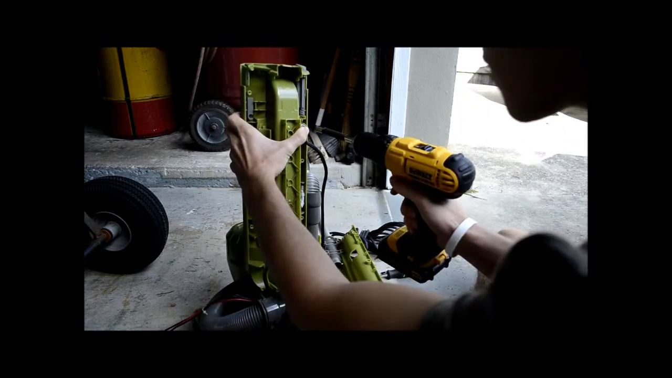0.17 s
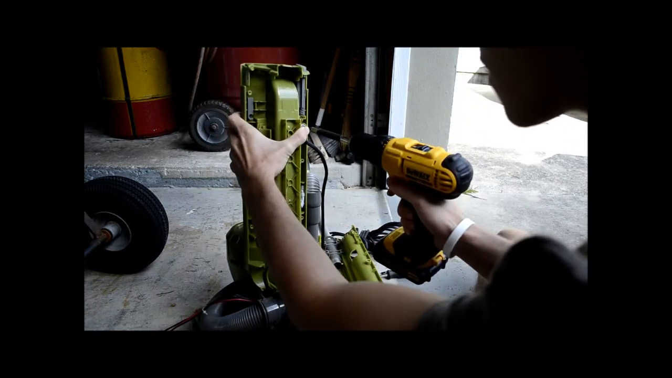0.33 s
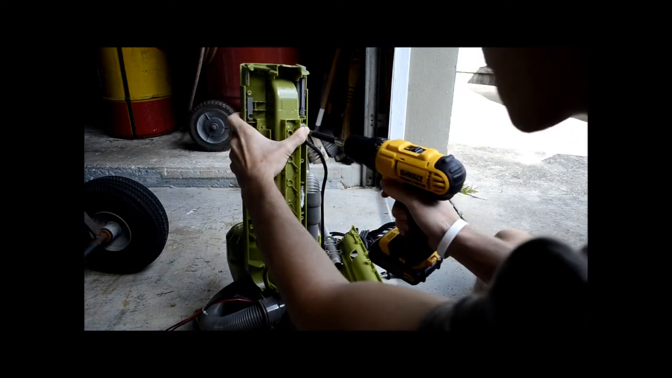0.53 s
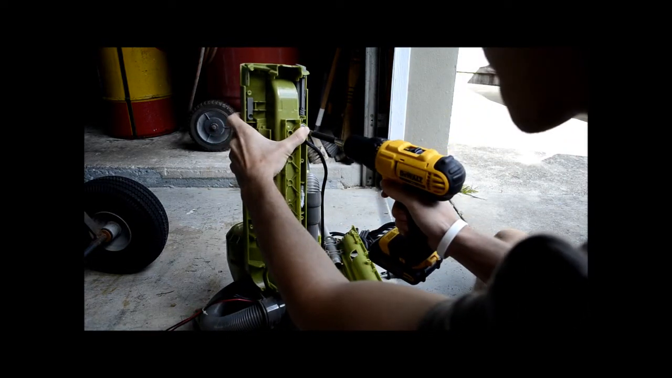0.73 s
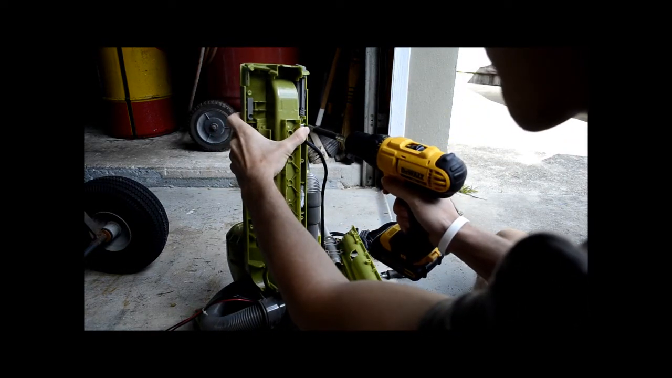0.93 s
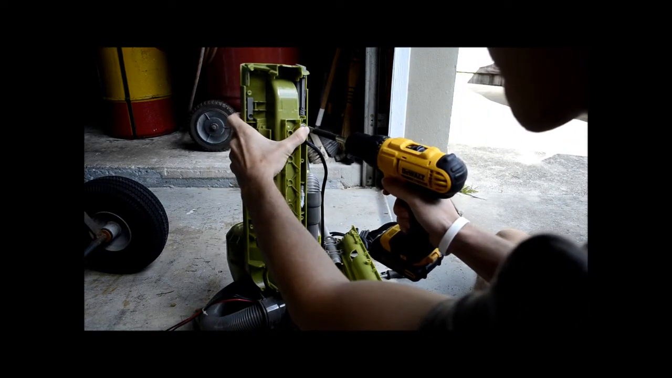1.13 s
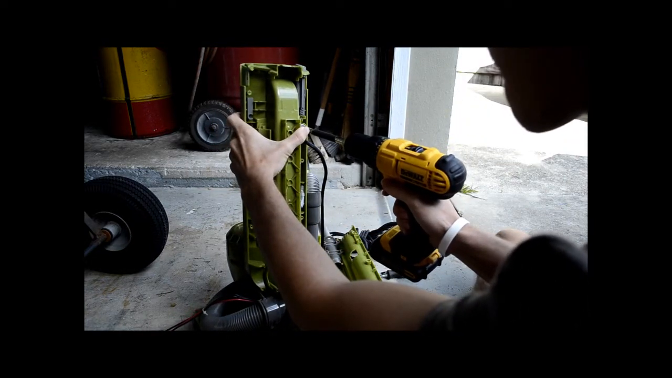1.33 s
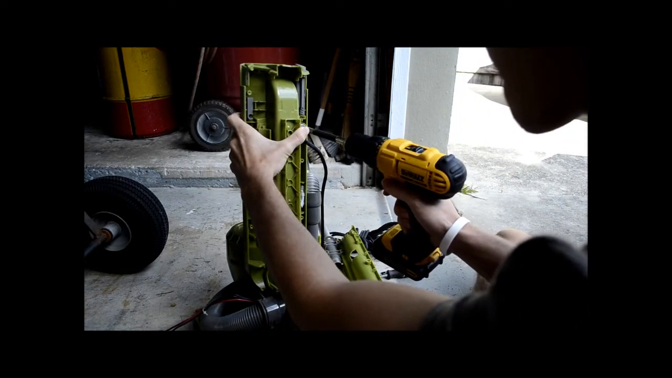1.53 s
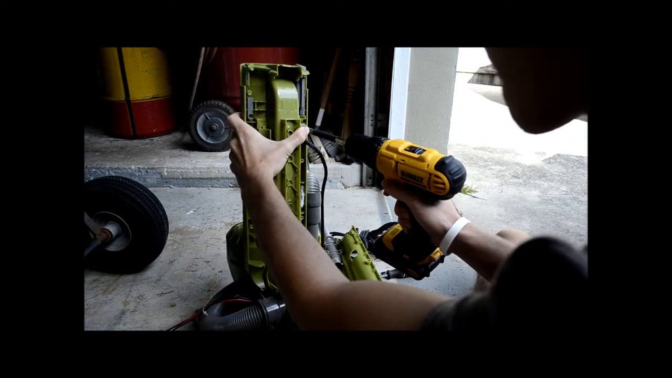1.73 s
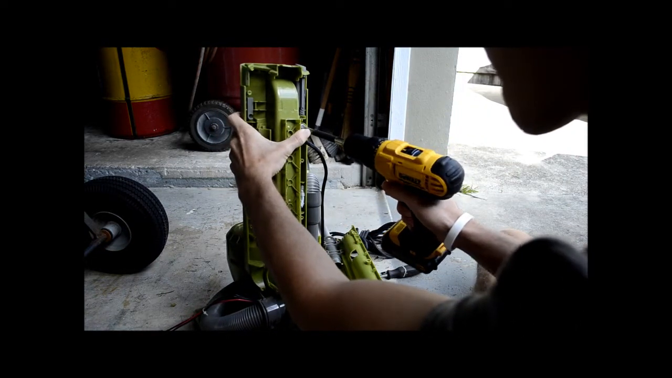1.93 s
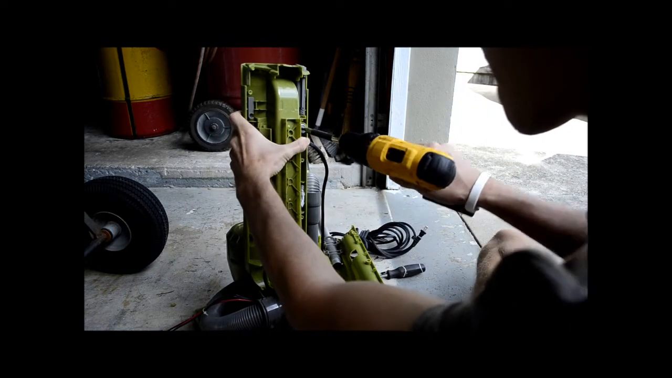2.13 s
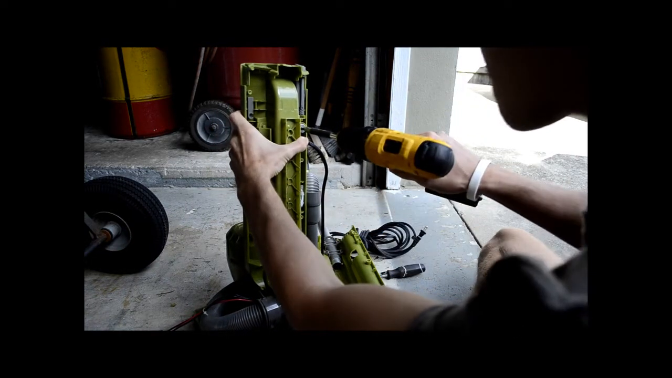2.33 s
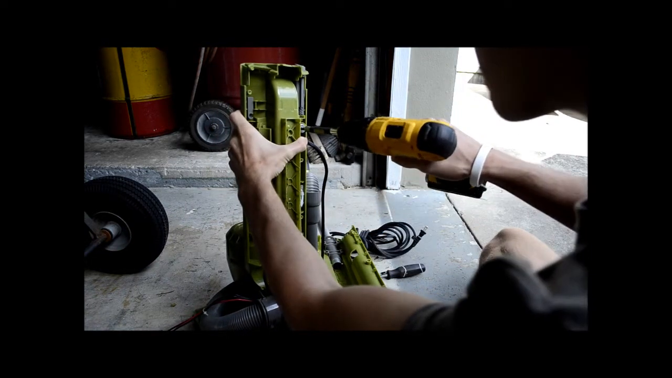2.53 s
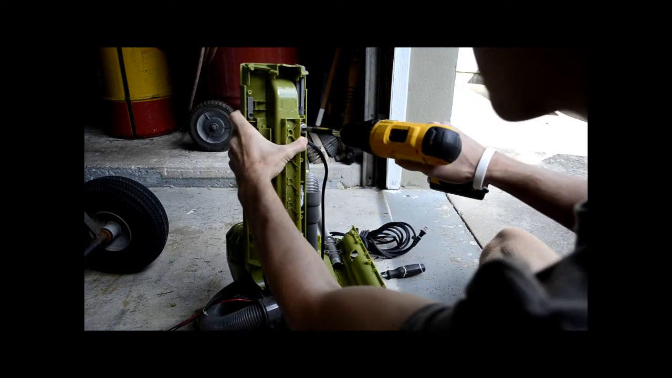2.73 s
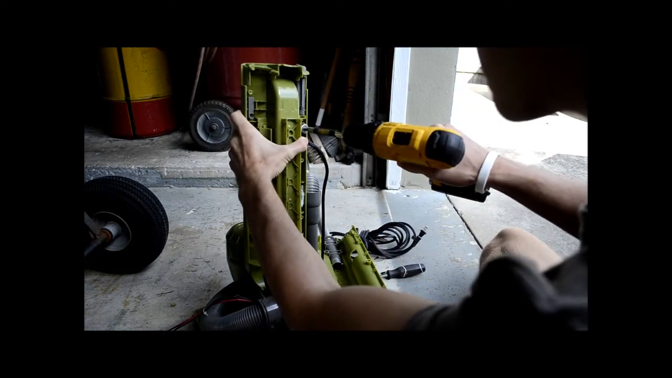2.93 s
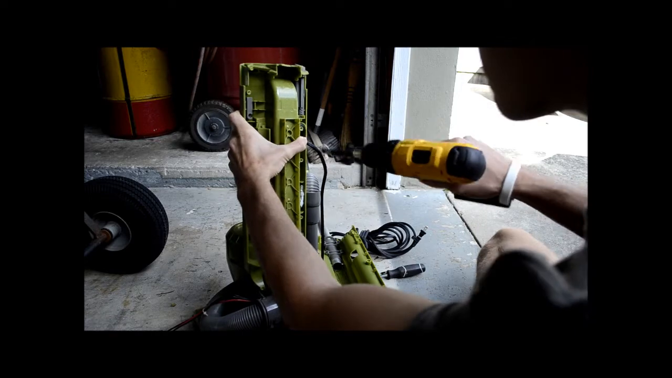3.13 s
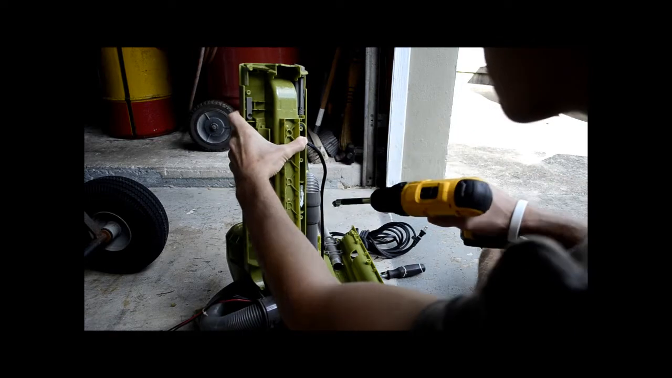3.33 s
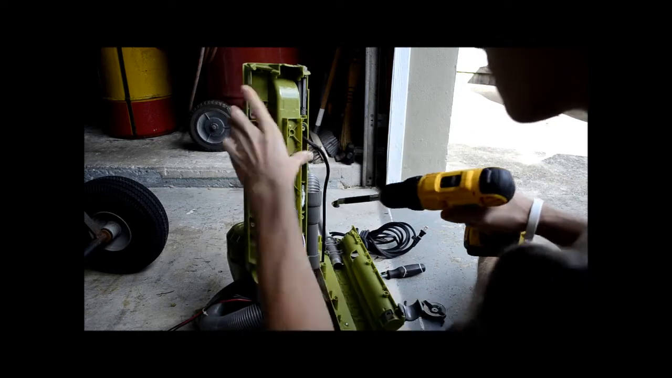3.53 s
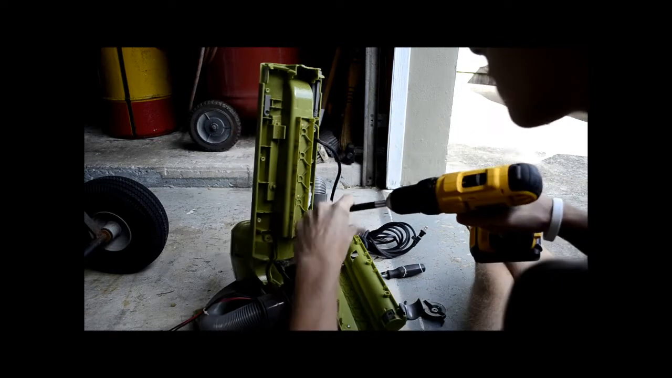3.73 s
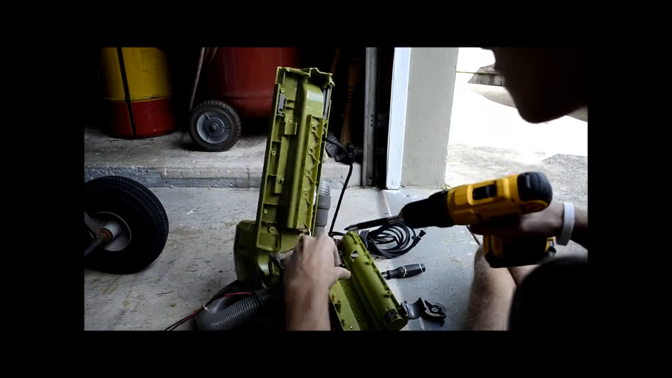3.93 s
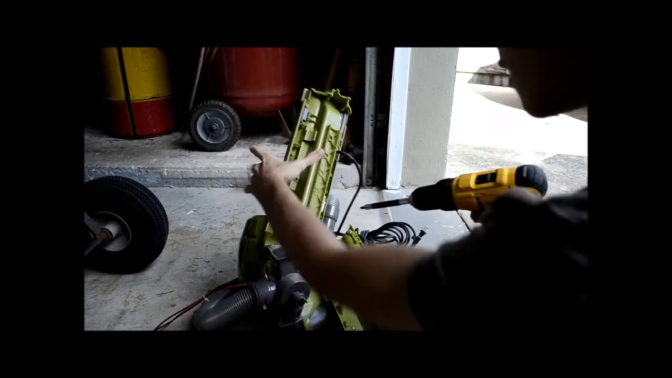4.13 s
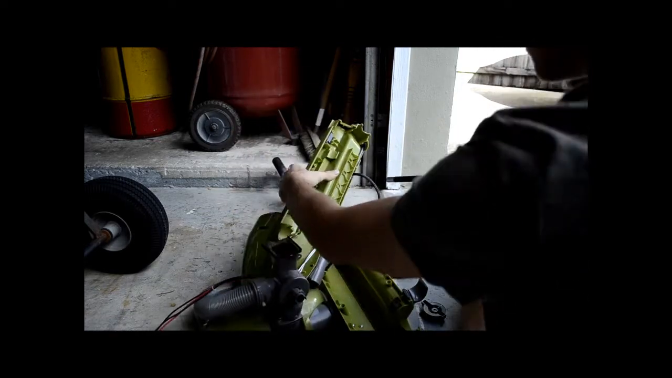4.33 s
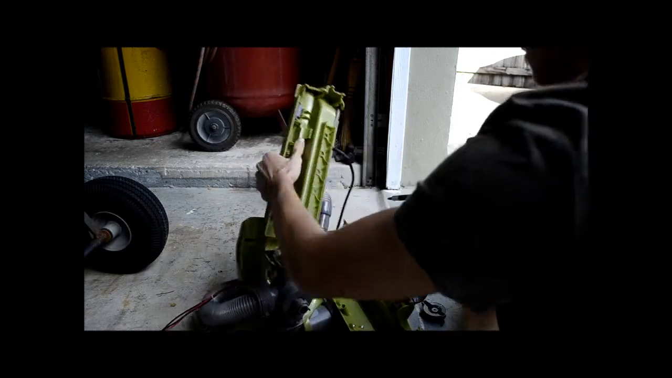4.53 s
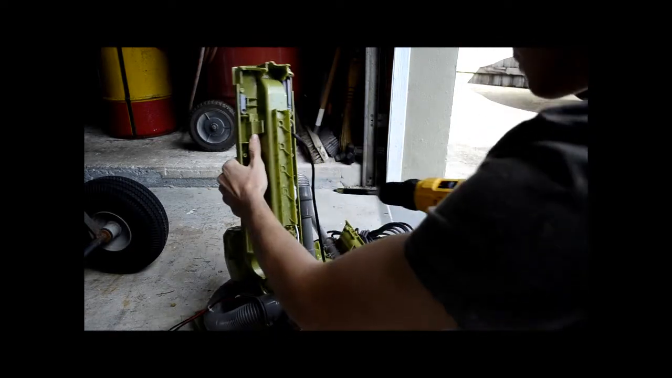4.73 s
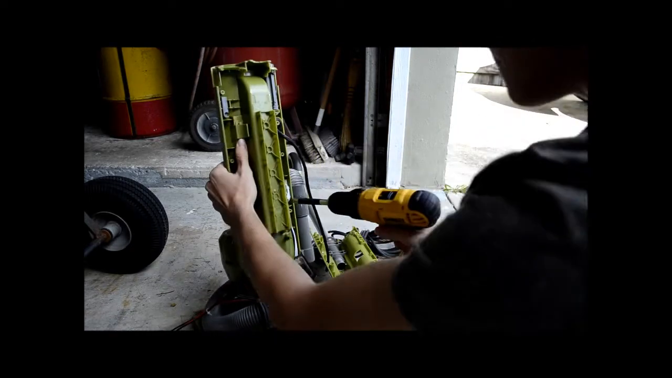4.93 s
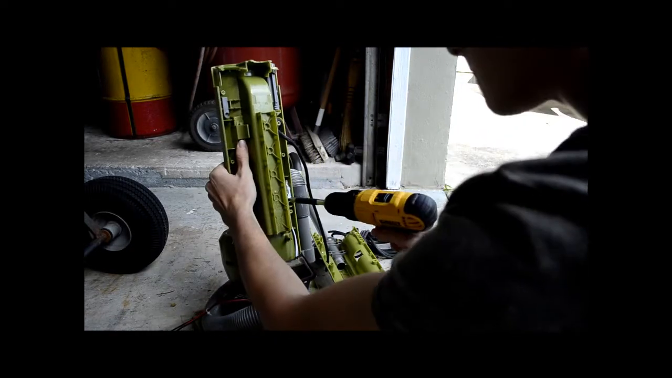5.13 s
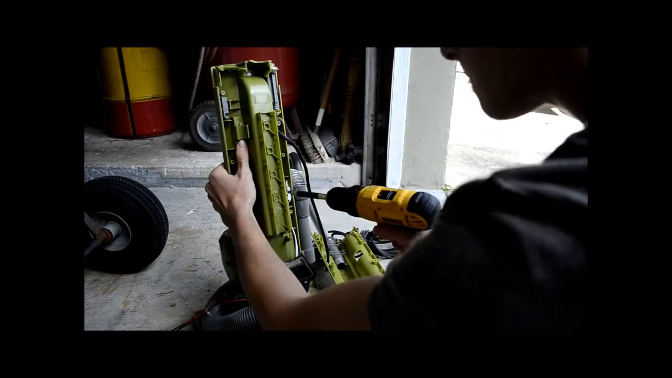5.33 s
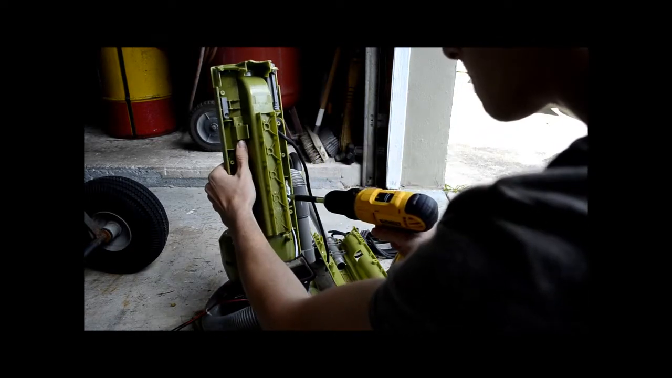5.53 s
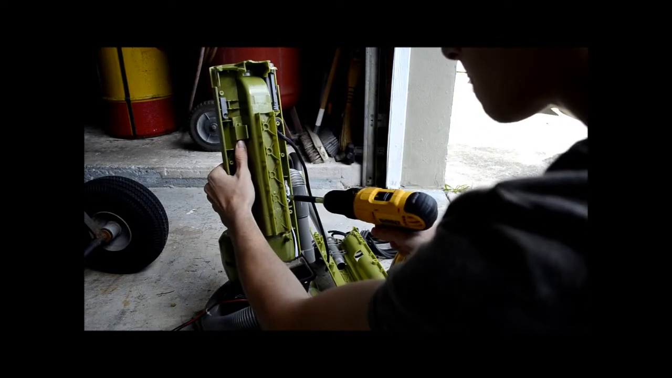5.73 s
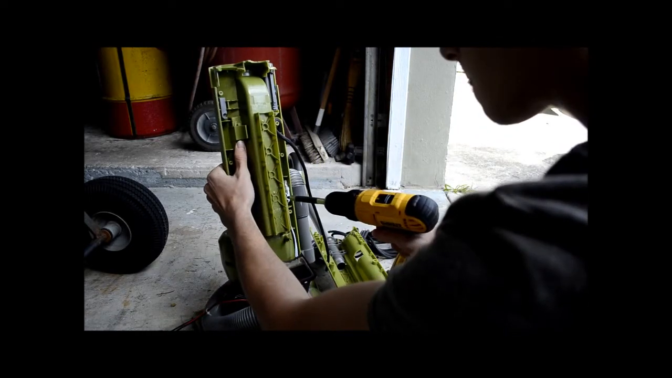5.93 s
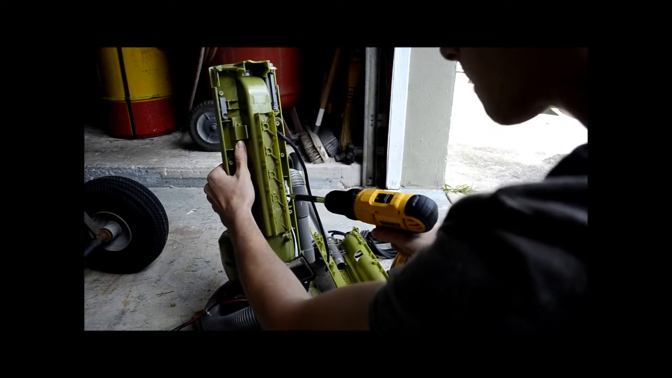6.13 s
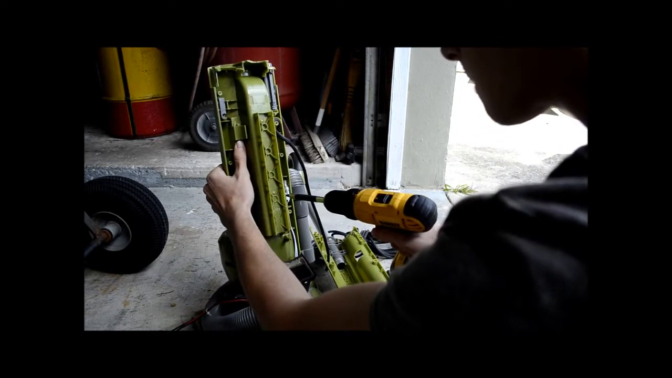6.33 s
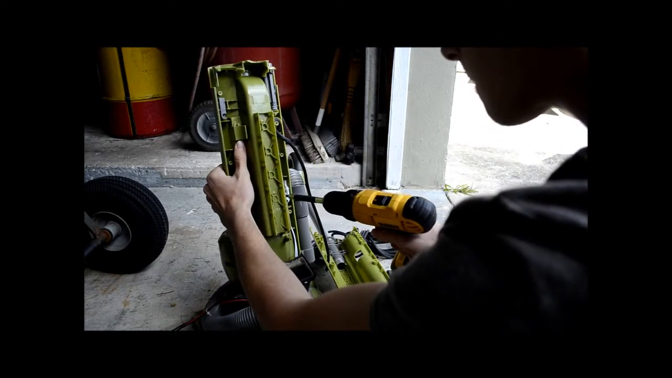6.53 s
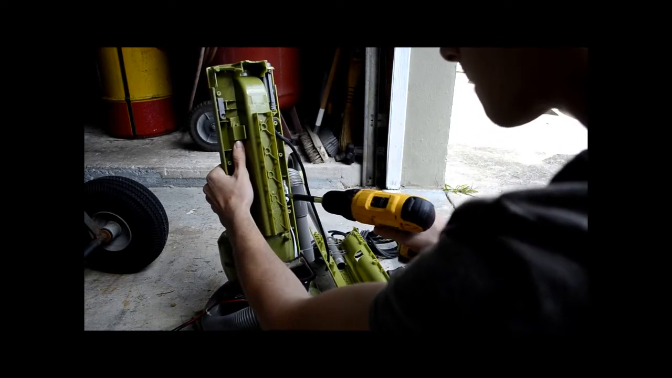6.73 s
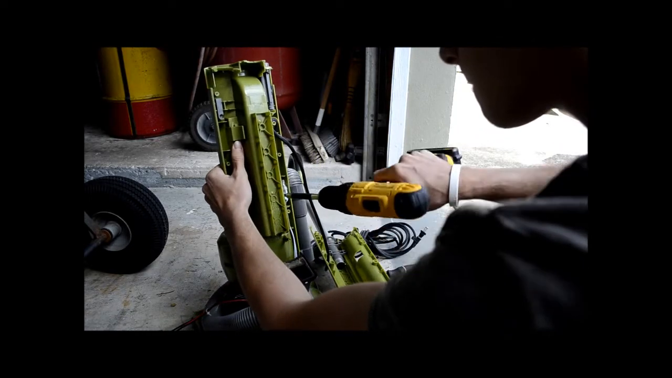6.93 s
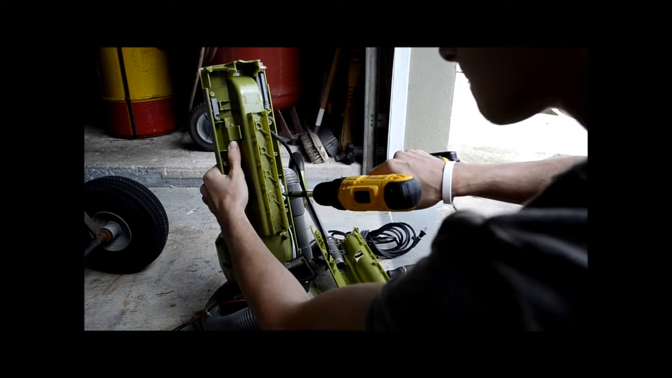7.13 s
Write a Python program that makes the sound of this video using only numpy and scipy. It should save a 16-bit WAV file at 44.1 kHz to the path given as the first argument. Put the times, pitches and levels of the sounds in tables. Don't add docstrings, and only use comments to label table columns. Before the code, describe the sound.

Low outdoor rumble and faint machine hum lie behind sparse handling knocks. The drill whirrs up quickly, runs briefly with rattling gears and hissing fan, and stops abruptly amid clicks. Small ticks lead to a cluster of hollow plastic thumps, scraping strokes on concrete and ringing loose parts. Quieter dull taps follow before the drill spins up once more. Near perspective, identical channels, short garage tail.

```python
import sys
import numpy as np
from scipy import signal
from scipy.fft import rfft, irfft
from scipy.io import wavfile

SR = 44100
rng = np.random.default_rng(int(sys.argv[2]) if len(sys.argv) > 2 else 0)


def wav_out(sig):
    wavfile.write(sys.argv[1], SR, np.round(np.clip(np.atleast_2d(sig).T, -1, 1) * 32767).astype(np.int16))


def gain_from_decibels(decibels):
    exponent = np.asarray(decibels, float) / 20
    return 10 ** exponent


N = 316197
T = np.arange(N) / SR


def rms_one(x):
    return x / np.sqrt(np.mean(x ** 2) + 1e-20)


def at_hz(points, hz):
    point_hz, level_db = np.array(points)[:, 0], np.array(points)[:, 1]
    return np.interp(np.log(np.maximum(hz, 1)), np.log(point_hz), level_db)


def colour(x, spectrum):
    hz = np.arange(N // 2 + 1) * SR / N
    return rms_one(irfft(rfft(x) * gain_from_decibels(at_hz(spectrum, hz)), N))


def drift(rate_hz):
    r = np.exp(-80 * np.pi * rate_hz / SR)
    noise = rng.standard_normal(N // 40 + 2002)
    slow = signal.lfilter([1], [1, -2 * r, r * r], noise)[2000:]
    return np.interp(np.arange(N) / 40, np.arange(len(slow)), rms_one(slow))


def resonate(x, hz, width_hz):
    r = np.exp(-np.pi * width_hz / SR)
    poles = [1, -2 * r * np.cos(2 * np.pi * hz / SR), r * r]
    return signal.lfilter([(1 - r * r) / 2, 0, (r * r - 1) / 2], poles, x + 1e-18)


def body(x, modes):
    total = 0
    for k, (hz, width_hz, level_db) in enumerate(modes):
        total = total + (-1) ** k * gain_from_decibels(level_db) * resonate(x, hz, width_hz)
    return rms_one(total)


def grains(per_s, spread_db):
    sizes = gain_from_decibels(spread_db * np.minimum(rng.exponential(1, N), 4)) * rng.choice([-1, 1], N)
    return sizes * (rng.random(N) < per_s / SR)


FULL_SPEED, SPIN_UP_S = 324.9, .06
COAST_TURNS_PER_S2, BRAKE_TURNS_PER_S2 = 525, 3300

# pull_s, let_go_s, brake_s, gear_load_db, slot_load_db
TRIGGER_PULLS = [
    (2.438, 2.885, 2.98, 2.1, -1.5),
    (7.003, 8.0, 8.1, 2.8, 1.5),
]


def shaft():
    speed, load_db = np.zeros(N), np.zeros((2, N))
    for pull, let_go, brake, *db in TRIGGER_PULLS:
        rise = FULL_SPEED * (1 - np.exp(-np.maximum(T - pull, 0) / SPIN_UP_S))
        coast_loss = COAST_TURNS_PER_S2 * np.maximum(T - let_go, 0)
        brake_loss = BRAKE_TURNS_PER_S2 * np.maximum(T - brake, 0)
        speed = speed + np.maximum(rise - coast_loss - brake_loss, 0)
        load_db = np.where(T > pull, np.c_[db], load_db)
    return speed, load_db


# pitch_hz, width_hz, level_db
GEARBOX_MODES = [(540, 60, -12), (975, 70, -9), (1400, 35, 0), (1620, 90, -9), (2280, 250, -16),
                 (3300, 600, -14)]
# pitch_hz, level_db per Hz
GEAR_SPECTRUM = [(150, -56), (250, -22), (313, -16.5), (413, -47), (968, -6), (1200, -12.5), (1370, -6),
                 (1740, -10), (5000, -35), (6500, -57), (11000, -120)]


def gears(turns, share, load_db):
    beat = 1 + 0.21 * np.cos(np.pi * turns + 0.82 * drift(27)) ** 3
    teeth = grains(9000, spread_db=2.5) * beat ** 2
    rattle = rms_one(body(teeth, GEARBOX_MODES) + 1.6 * colour(teeth, GEAR_SPECTRUM))
    return gain_from_decibels(-31.5 + load_db) * share ** 3.1 * rattle


# pitch_hz, level_db per Hz
FAN_SPECTRUM = [(2350, -8.5), (4000, -25), (5120, -10), (5940, -12), (7460, -7), (8610, -7), (9330, -10),
                (10100, -6), (10600, -8), (11600, -10), (15700, -24)]
# pitch_hz, width_hz, level_db
FAN_MODES = [(5110, 130, -1), (8440, 60, -6), (9640, 47, -3), (11500, 70, -8)]


def fan(turns, share):
    air = rng.standard_normal(N) * (1 + 0.17 * np.cos(2 * np.pi * turns)) * gain_from_decibels(1.1 * drift(45))
    hiss = rms_one(colour(air, FAN_SPECTRUM) + .35 * share ** 4 * body(air, FAN_MODES))
    return gain_from_decibels(-40) * share ** 1.2 * hiss


# multiple of shaft speed, level_db
SHAFT_ORDERS = [(4, -45), (5, -43), (7, -53), (10, -57), (11, -58), (15, -58), (20, -63), (21, -63),
                (26, -59), (31, -50), (32, -61), (33, -63), (35, -61), (38, -67), (41, -65), (42, -72),
                (47, -72)]


def whine(turns, speed):
    free = np.exp(-((speed - FULL_SPEED) / 6) ** 2)
    tones = 0
    for k, level_db in SHAFT_ORDERS:
        level = gain_from_decibels(level_db + 5 + 2.5 * drift(15))
        tones = tones + level * np.sin(2 * np.pi * (k * turns + rng.random()))
    return free * tones


# multiple of shaft speed, level_db
MAGNETIC_ORDERS = [(8, -4), (10, -7), (12, 0), (14, -10), (16, -9), (24, -8)]
# pitch_hz, width_hz, level_db
MOTOR_CASE = [(2500, 560, -1), (3310, 570, -0.3), (5030, 1140, -1.5)]


def slots(turns, speed, load_db):
    share = speed / FULL_SPEED
    strain = np.abs(np.gradient(speed)) * SR * SPIN_UP_S / FULL_SPEED
    sparks = rms_one(signal.lfilter([1], [1, -.965], rng.standard_normal((len(MAGNETIC_ORDERS), N))))
    lines = 0
    for (k, level_db), spark in zip(MAGNETIC_ORDERS, sparks):
        level = gain_from_decibels(level_db) * (.65 * gain_from_decibels(4 * drift(25)) + spark)
        lines = lines + level * np.sin(2 * np.pi * k * turns + drift(25))
    whirr = .5 * lines + body(lines, MOTOR_CASE)
    return gain_from_decibels(-51 + load_db) * share ** 1.4 * (1 + 6.3 * strain) * whirr


CHOPPER_HZ = 3940
# start_s, end_s, level_db
CHOPPER_BURSTS = [
    (2.449, 2.482, -48),
    (7.002, 7.03, -52),
]


def chopper(turns):
    gate = 0
    for on, off, level_db in CHOPPER_BURSTS:
        gate = gate + gain_from_decibels(level_db) * np.interp(T, [on, on + .004, off - .012, off], [0, 1, .35, 0])
    wobble = 1.5 * np.sin(2 * np.pi * turns)
    harmonics_db = [0, -14, -18]
    whistle = sum(gain_from_decibels(db) * np.sin(2 * np.pi * k * CHOPPER_HZ * T + wobble)
                  for k, db in enumerate(harmonics_db, 1))
    return gate * whistle


def drill():
    speed, (gear_db, slot_db) = shaft()
    turns, share = np.cumsum(speed) / SR, speed / FULL_SPEED
    motor = gears(turns, share, gear_db) + fan(turns, share) + slots(turns, speed, slot_db)
    return motor + whine(turns, speed) + chopper(turns)


# start_s, peak_db, boom_db, clack_db
SOLID_BLOWS = [(0.4875, -16.5, -2.5, -25.5), (2.1075, -32.5, 3, -45), (2.1125, -14, -19, -42),
               (2.119, -13.5, 1, -12), (2.4655, -12, -9, -16.5), (3.684, -36, 8.5, -22),
               (4.079, -21.5, -6, -24), (4.0964, -11, -15, -5), (4.1688, -11.5, -5, -32),
               (4.2192, -5, -4, -22), (4.5577, -15, -16, -4), (4.582, -14.5, -23, -8),
               (4.6436, -18.5, -1.5, -5.5), (4.6858, -25, 6, -12), (4.7595, -26, -16, -0.5),
               (5.4023, -17, 0, -25.5), (6.2103, -18.5, 0, -20), (6.772, -17.5, 0, -19)]
# start_s, peak_db, boom_db, clack_db
PLASTIC_TAPS = [(1.2989, -24.5, -4, -25), (1.3987, -27, -13, -18), (1.621, -28, -34, -22),
                (2.134, -41, -8, -15), (2.804, -9, 2.5, -17), (2.9985, -10.5, -14, -10),
                (3.0104, -15, -44, -13), (3.018, -11, -30, -5), (3.1019, -25.5, -4, -25),
                (3.6503, -39, 1, -7), (4.2359, -8, 2.5, -27), (4.3944, -27.5, -21, -7),
                (4.4388, -30, -3, -12), (4.8066, -25, 7.5, -21), (4.8174, -21, -26, -21.5),
                (4.983, -34, -8.5, -15.5), (5.5344, -34.5, -13, -11), (6.386, -30.5, -12, -24.5),
                (6.7793, -20, -12, -23), (6.7994, -21, 1, -17), (6.8494, -40, -13, -11),
                (6.8938, -17.5, 0.5, -3.5)]
# start_s, peak_db, boom_db, clack_db
STEEL_TICKS = [(0.9645, -25.5, -20, -23), (2.4542, -18.5, -11, -21), (2.9912, -0.5, -12, -23),
               (3.1944, -39, -8, -15), (3.3286, -42, -4, -16), (3.3588, -41, -9, -17),
               (3.4077, -30, -14, -25), (3.7514, -38.5, 1, -13), (3.7895, -27.5, -3, -27),
               (3.9674, -19.5, -2, -10), (4.156, -22.5, 0, -16), (4.335, -17, 8, -8),
               (4.414, -13, -12, -29), (4.4265, -28, -22.5, -24), (4.4569, 4.5, -9.5, -9),
               (6.4444, -41, -2, -22), (6.5763, -24.5, -2.5, -20.5), (7.1664, -18, -29, -27)]
# pitch_hz, level_db
HOUSING_COLOUR = [(700, 0.3), (1050, 1), (1600, -0.2), (2300, 0.5), (3000, 1.3), (4200, -0.5), (7000, -1.5),
                  (12000, 3)]


def knocks(size=2048, count=36):
    # contacts, tick over clack in dB, contact length in ms
    kinds = [(SOLID_BLOWS, -14.5, 11.2), (PLASTIC_TAPS, -25, 5.5), (STEEL_TICKS, -2, 7.75)]
    contacts = sorted((*row, row[3] + tick_db, length_ms) for rows, tick_db, length_ms in kinds for row in rows)
    pitches, hz = np.geomspace(330, 15500, count), np.arange(size // 2 + 1) * SR / size
    n, out = np.arange(size), np.zeros((2, N + size))
    fold = np.where((n > 0) & (n < size // 2), 2, n % (size // 2) == 0)
    dull = 1 / (1 + 1j * hz / 3000)
    luck = rng.standard_normal((len(contacts), count))
    chatter = rng.standard_normal((len(contacts), size))
    for contact, chance, force in zip(contacts, luck, chatter):
        s, peak_db, boom_db, clack_db, tick_db, length_ms = contact
        tilt = list(zip([120, 550, 1500, 3900, 10000, 15500],
                        [boom_db - 14, boom_db, 0, clack_db, tick_db, tick_db - 12]))
        uneven_db = 1.7 * at_hz(np.transpose([pitches, chance]), hz)
        shape_db = at_hz(tilt, hz) + at_hz(HOUSING_COLOUR, hz) + uneven_db
        response = np.exp(rfft(irfft(np.log(gain_from_decibels(shape_db))) * fold))
        blow = irfft([response * dull, response * (1 - dull)])
        lengths = np.clip(length_ms, .2, 15) / 1000 * np.array([[1], [.55]])
        push = (force + 4.5 * (n == 0)) * np.exp(-n / SR / lengths) / np.sqrt(lengths)
        hit = rms_one(signal.fftconvolve(push, blow, axes=1)[:, :size].sum(axis=0))
        sound = np.stack([hit, rms_one(blow.sum(axis=0))])
        level = gain_from_decibels(peak_db + max(0, boom_db, clack_db, tick_db))
        at = round(s * SR)
        out[:, at:at + size] += level * sound / np.abs(hit).max()
    high_pass = signal.butter(2, 200, "high", fs=SR, output="sos")
    return gain_from_decibels(-5.0) * signal.sosfilt(high_pass, out[:, :N])


# pitch_hz, width_hz, level_db
LOOSE_MODES = [(420, 30, -8), (677, 16, -9), (950, 60, -3), (1075, 60, -3), (1700, 30, -7), (2630, 28, -3),
               (2810, 28, -4), (3300, 40, -4), (3600, 28, 0), (4400, 45, -1)]


def loose_parts(hits):
    shaken = hits * np.interp(T, [4.05, 4.09, 4.85, 4.9], [0, 1, 1, 0])
    return sum(gain_from_decibels(db + 10) * resonate(shaken, hz, width_hz) for hz, width_hz, db in LOOSE_MODES)


# start_s, full_s, let_go_s, drag_db, grit_db
DRAG_STROKES = [
    (4.062, 4.245, 4.262, -22, -44.5),
    (4.325, 4.338, 4.342, -37, -66),
    (4.397, 4.422, 4.454, -22, -48),
    (4.46, 4.52, 4.66, -44, -52.5),
    (4.66, 4.68, 4.78, -46, -54.5),
    (4.776, 4.796, 4.85, -39.5, -59),
]


def strokes(levels_db, power, fall_db_per_s):
    total = 0
    for (on, full, off, *_), level_db in zip(DRAG_STROKES, levels_db):
        swell = np.clip((T - on) / max(full - on, .002), 0, 1) ** power
        total = total + gain_from_decibels(level_db - fall_db_per_s * np.maximum(T - off, 0)) * swell
    return total


# pitch_hz, width_hz, level_db
SHELL_MODES = [(277, 100, -7.5), (417, 74, -12.5), (677, 66, 4), (1001, 150, 7.5), (1055, 130, 6),
               (1384, 200, -4), (1850, 170, -3.5), (2630, 650, -13), (3650, 770, -19)]


def drag():
    drag_db, grit_db = np.transpose(DRAG_STROKES)[3:]
    slips = grains(3000, spread_db=3) * gain_from_decibels(2 * drift(40))
    grit_band = signal.butter(2, [2400, 6000], "band", fs=SR, output="sos")
    grit = rms_one(signal.sosfilt(grit_band, grains(6000, spread_db=3)))
    drone = rms_one(resonate(rng.standard_normal(N), 163, 18.0))
    return (strokes(drag_db, 2.3, 651) * body(slips, SHELL_MODES)
            + strokes(grit_db, 2.3, 651) * grit
            + strokes(-30 + 0.71 * drag_db, .6, 401) * drone)


# pitch_hz, t60_s
GARAGE_T60 = [(300, 0.34), (800, 0.27), (2100, 0.26), (5500, 0.17), (12000, 0.18)]


def garage(x):
    size, edges = SR // 2, 150 * 2. ** np.arange(8)
    t, tail = np.arange(size) / SR, 0
    for low, high in zip(edges, edges[1:]):
        octave = signal.butter(2, [low, high], "band", fs=SR, output="sos")
        band = signal.sosfilt(octave, rng.standard_normal(size))
        t60_s = np.maximum(at_hz(GARAGE_T60, np.sqrt(low * high)), .05)
        tail = tail + band * gain_from_decibels(-60 * t / t60_s)
    tail = tail * np.clip((t - .003) / .008, 0, 1)
    return signal.fftconvolve(x, tail / np.sqrt(np.sum(tail ** 2)))[:N]


def wavering(lines, offset_db, waver_db, level_hz, phase_hz):
    total = 0
    for hz, level_db in lines:
        level = gain_from_decibels(level_db + offset_db + waver_db * drift(level_hz))
        total = total + level * np.sin(2 * np.pi * hz * T + .5 * drift(phase_hz))
    return total


# pitch_hz, level_db rms
HUM_TONES = [(88.6, -49), (120, -58), (298, -61), (640.6, -65), (15671, -78)]


def compressor():
    return wavering(HUM_TONES, 2.5, 1.2, 5.8, 1.7)


# time_s, level_db
IDLE_LEVEL = [(0, -120), (1.5, -63), (2.0, -55.5), (3.0, -58.5), (4.6, -66), (5.2, -52), (6.3, -55),
              (7.17, -65)]
# pitch_hz, level_db
IDLE_ORDERS = [(70.6, -10.5), (94.3, -20.5), (164.7, -1), (188.2, -0.5)]


def far_engine():
    time_s, level_db = np.transpose(IDLE_LEVEL)
    return gain_from_decibels(np.interp(T, time_s, level_db) - 2.5) * wavering(IDLE_ORDERS, 0, 1.2, 4.1, 1.6)


# centre_s, level_db
DRAUGHT_MOANS = [
    (0.1, -47),
    (6.62, -51),
]


def draught():
    swell = sum(gain_from_decibels(db) * np.exp(-((T - s) / 0.075) ** 2) for s, db in DRAUGHT_MOANS)
    return swell * rms_one(resonate(rng.standard_normal(N), 319, 24.0))


# pitch_hz, level_db per Hz
AIR_SPECTRUM = [(20, -50.5), (30, -24.5), (59, -8), (90, -9.5), (140, -14), (190, -16.5), (290, -12),
                (430, -14), (640, -10), (1000, -11.5), (2300, -26), (5400, -43.5), (11500, -47.5),
                (15000, -55.5)]


def street():
    air = gain_from_decibels(-47 + .6 * drift(1.5) + .5 * drift(12)) * colour(rng.standard_normal(N), AIR_SPECTRUM)
    insects = gain_from_decibels(-77.) * rms_one(resonate(rng.standard_normal(N), 4010, 120.))
    return air + insects


def scene():
    hits, blows = knocks()
    tools = drill() + drag()
    near = hits + loose_parts(hits) + tools
    reflected = garage(gain_from_decibels(-6.5) * blows + gain_from_decibels(-7.5) * tools)
    mono = near + reflected + street() + draught() + compressor() + far_engine()
    return np.stack([mono, mono])


def top_cut(x):
    return signal.sosfilt(signal.butter(12, 16660, fs=SR, output="sos"), x)


def record(dry):
    rounded = 1.7 * np.tanh(dry / 1.7)
    low_pass = signal.cheby2(12, 60, 16700, fs=SR, output="sos")
    mix = signal.sosfilt(low_pass, rounded)
    return top_cut(mix)


dry = scene()
out = record(dry)
wav_out(out)
```